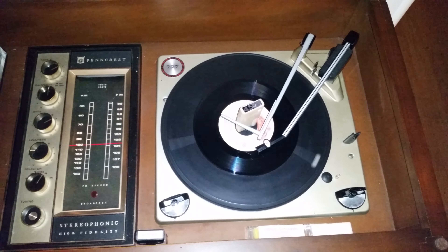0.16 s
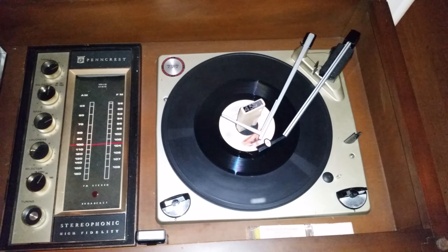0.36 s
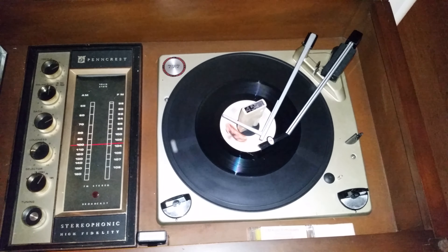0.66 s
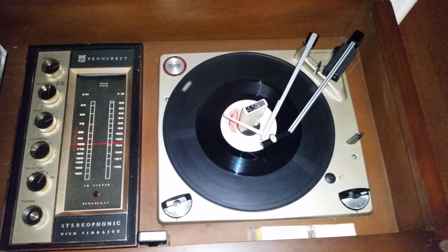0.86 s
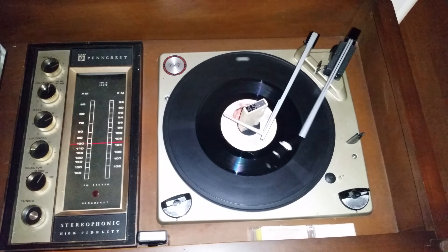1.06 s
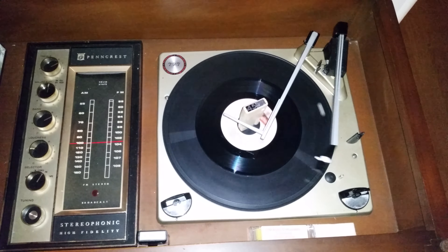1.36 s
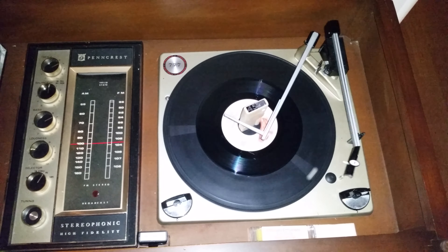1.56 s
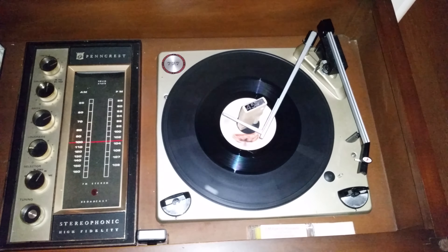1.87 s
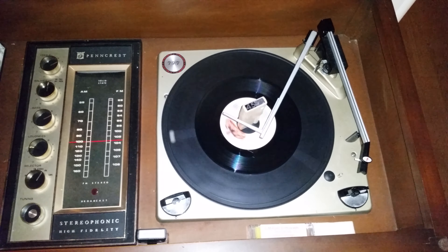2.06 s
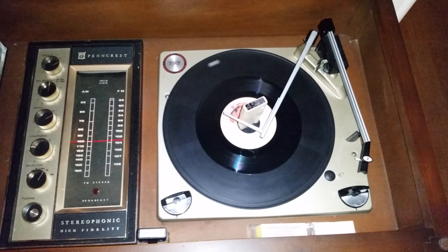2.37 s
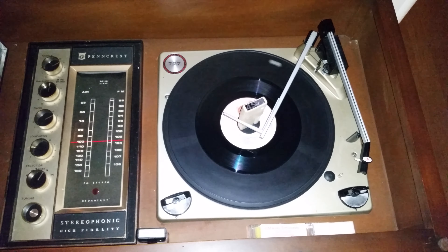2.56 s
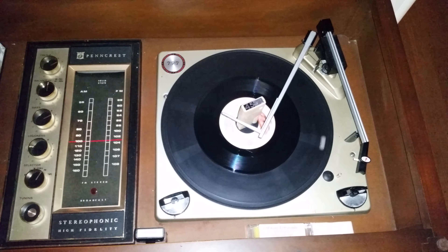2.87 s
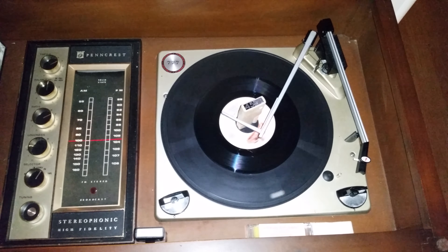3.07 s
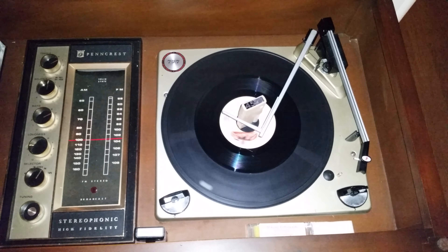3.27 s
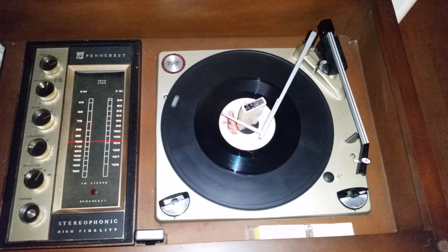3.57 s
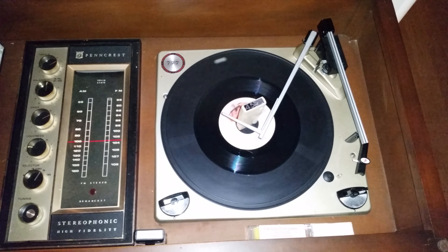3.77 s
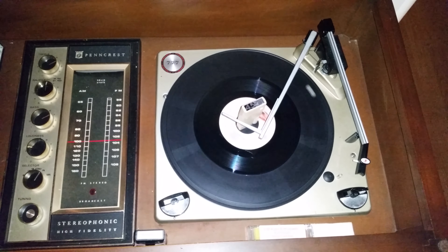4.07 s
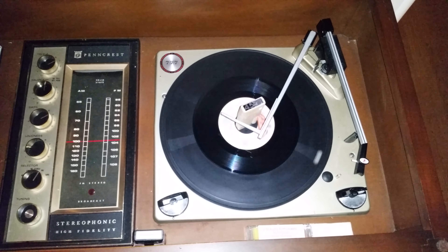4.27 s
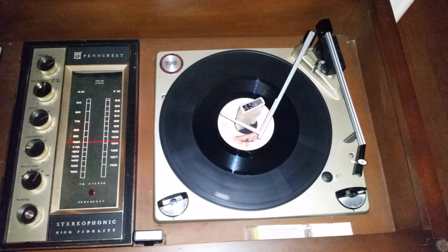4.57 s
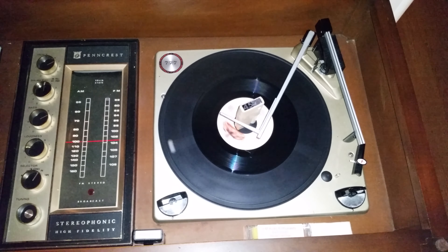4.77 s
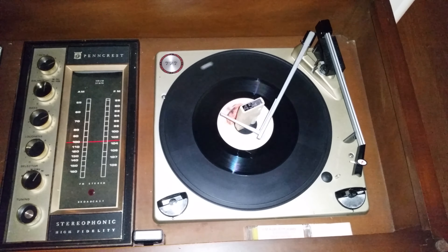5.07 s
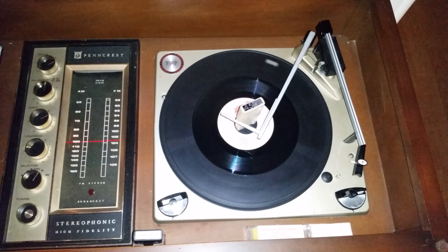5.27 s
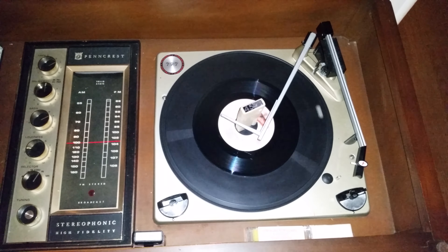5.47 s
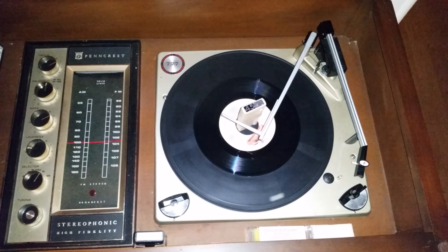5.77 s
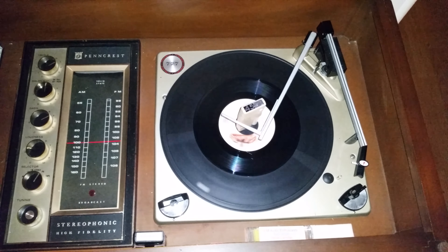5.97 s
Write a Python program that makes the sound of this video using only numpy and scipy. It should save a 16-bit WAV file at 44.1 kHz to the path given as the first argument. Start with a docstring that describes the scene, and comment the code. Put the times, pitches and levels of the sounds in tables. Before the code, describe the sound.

An old record changer's tonearm lifts and swings to rest with sharp metallic clicks and soft clunks over a humming, whirring motor, then snaps off.

```python
"""In a wooden cabinet, an automatic record changer lifts its tonearm, swings it to the rest and shuts off.
Shaped noise bursts make levers and cams click and rattle, coloured by broad resonances and ringing modes.
Soft pushes ring cabinet and sprung deck as clunks; faint noise ticks are the gears.
The motor is a humming sine under whirring noise until it is cut.
Two unlike microphone ports hear it from close above."""
import sys
import numpy as np
from scipy import signal
from scipy.fft import rfft, irfft
from scipy.io import wavfile
from scipy.ndimage import uniform_filter1d

SR = 44100
rng = np.random.default_rng(int(sys.argv[2]) if len(sys.argv) > 2 else 0)


def wav_record(signal):
    """Record a signal, one row per channel, as 16-bit PCM in the file named by sys.argv[1]."""
    frames = np.transpose(np.atleast_2d(signal))
    bounded = np.clip(frames, -1, 1)
    # unit amplitude maps onto the largest positive 16-bit level
    quanta = np.round(bounded * 32767).astype(np.int16)
    wavfile.write(sys.argv[1], SR, quanta)


N = 270333


def undb(db):
    """Decibels to gain."""
    return 10 ** (np.asarray(db) / 20)


def colour(x, table):
    """Equalise a left and right pair along log frequency; below the first row all but nothing passes."""
    hz, *ports = np.transpose(table)
    log_f = np.log(np.arange(N // 2 + 1) * SR / N + 1)
    gains_db = [np.interp(log_f, np.log(hz), port, -140) for port in ports]
    return irfft(rfft(x) * undb(gains_db), N)


def ring(x, modes):
    """Decaying modes driven by x, scaled so that decay time hardly changes the level under noise."""
    out = 0
    for hz, db, t60 in modes:
        # no mode dies faster than 60 dB in 0.02 s
        r = np.exp(-np.log(1000) / (max(t60, .02) * SR))
        w = 2 * np.pi * hz / SR
        mode = signal.lfilter([0, r * np.sin(w)], [1, -2 * r * np.cos(w), r * r], x)
        out = out + undb(db) * np.sqrt(1 - r) * mode
    return out


def resonate(x, hz, sharp):
    """One broad resonance of a struck part, passing its centre at unit gain."""
    return signal.lfilter(*signal.iirpeak(hz, sharp, SR), x)


def walk(rate):
    """Wandering level: random steps held for 1 / rate seconds, then smoothed twice."""
    k = int(SR / rate)
    steps = np.repeat(rng.standard_normal(N // k + 1), k)
    return 1.3 * uniform_filter1d(uniform_filter1d(steps, k), k)[:N]


def add(track, s, sound):
    """Mix a sound into a track at s seconds."""
    i = int(s * SR)
    track[..., i:i + sound.shape[-1]] += sound[..., :N - i]


# whirr and hiss at each port, before the whirr level: f/Hz, left level/dB per Hz, right level/dB per Hz
WHIRR_COLOUR = [(25, -77, -73), (61, -97.5, -88), (206, -90.5, -90), (648, -92.5, -99.5), (1240, -99, -101),
                (2550, -99, -106), (3500, -93.5, -109), (4430, -88, -112), (4750, -93, -114),
                (5960, -107, -116), (8010, -111, -115), (10100, -105, -112), (11680, -102, -102),
                (15860, -105, -105)]
# whirr level before the spin-down fall: t/s, level/dB
WHIRR_LEVEL = [(0, 4.5), (.5, 7.5), (.7, 1.5), (1.099, 4.5), (2.002, 7), (2.3, 0), (3.6, 0.5), (3.9, 5),
               (4.5, 0.5), (5.55, 2), (5.7, 3.5), (6.13, 11)]
HUM_HZ, HUM_DB, HUM_PER_WHIRR = 120.3, -64, 0.33  # base level; hum dB per dB of whirr level
TRIP_HUM_DB, TRIP_END_S = 9.5, 0.64  # extra hum while the trip gear engages
CUT_S, CUT_HUM_DB, COAST_S, SPIN_DOWN_DB_PER_S = 5.72, -11, 0.11, 63.5


def motor(share_hz=350, flicker_db=0.64):
    """Mains hum over a whirr whose bass the ports share; both follow the whirr level and sink after the cut."""
    t = np.arange(N) / SR
    level_db = np.interp(t, *np.transpose(WHIRR_LEVEL))
    tripping = np.clip((TRIP_END_S - t) / 0.15 + .5, 0, 1)
    cut = np.clip((t - CUT_S) / COAST_S, 0, 1)
    whirr_db = level_db - SPIN_DOWN_DB_PER_S * np.maximum(t - CUT_S - COAST_S, 0)
    hum_db = HUM_DB + HUM_PER_WHIRR * level_db + TRIP_HUM_DB * tripping + CUT_HUM_DB * cut
    # the ports grow less alike with rising frequency
    f = np.arange(N // 2 + 1) * SR / N
    like = 0.61 / (1 + (f / share_hz) ** 2)
    mid, side = rfft(rng.standard_normal((2, N)))
    mid = np.sqrt((1 + like) / 2) * mid
    side = np.sqrt((1 - like) / 2) * side
    pair = irfft(mid + side * np.array([[1], [-1]]), N)
    whirr = colour(pair * np.sqrt(SR / 2), WHIRR_COLOUR) * undb(whirr_db + flicker_db * walk(4.3))
    bass = signal.sosfilt(signal.butter(1, 220, fs=SR, output="sos"), whirr)
    whirr = whirr - bass * cut * 0.41  # the shaft rumble drops first
    hum = np.sqrt(2) * np.sin(2 * np.pi * HUM_HZ * t) * undb(hum_db + 2.0 * walk(6.0))
    return whirr + hum * undb([[.8], [-.8]])


# modes of cabinet and deck, from deep thud up to deck plate: f/Hz, level/dB, t60/s
THUD_MODES = [(71.6, 11.5, 0.18), (108, 0, 0.18)]
KNOCK_MODES = [(162, 0, 0.13), (179, -8, 0.15), (241, 1.5, 0.04)]
RING_MODES = [(355, -1.5, 0.08), (310.5, -3, 0.05)]
DECK_MODES = [(609, -6, 0.042), (719, -4.5, 0.038), (790, -10, 0.29), (1157, -15, 0.023), (948, -18, 0.062)]


def trip(rumble_db=-53, scrape_db=-66):
    """While the trip gear engages, uneven noise rumbles the cabinet and faintly scrapes the deck."""
    engaged = np.clip((TRIP_END_S - np.arange(N) / SR) / 0.053, 0, 1)
    drive = engaged * undb(walk(17.0) * 2.0) * rng.standard_normal(N)
    rumble = undb(rumble_db) * ring(drive, THUD_MODES[1:] + KNOCK_MODES)
    scrape = undb(scrape_db) * ring(drive, RING_MODES + DECK_MODES)
    return rumble + scrape


# how each port hears the body of the metal parts: f/Hz, left level/dB, right level/dB
BODY_COLOUR = [(540, -1, -10), (1210, -0.5, -4), (3230, -2.5, -17.5), (6050, -3, -12), (9000, 0, -18.5)]


def gears(count=380, rub_db=-48.5, spread_db=4, deck_db=-8):
    """Faint, irregular noise ticks from 700 to 2800 Hz follow the whirr level and start until the motor is cut."""
    out = np.zeros((2, N))
    t = np.arange(int(.06 * SR)) / SR
    rubs = rng.standard_normal((count, len(t)))
    for (when, pitch, chance), rub in zip(rng.random((count, 3)), rubs):
        s = when * CUT_S
        level_db = np.interp(s, *np.transpose(WHIRR_LEVEL))
        luck_db = -spread_db * np.log(chance + 0.0304)  # a few ticks stand out
        tick = rub * undb(rub_db + level_db + luck_db - 60 * t / 0.025)
        add(out, s, resonate(tick, 700 * 4 ** pitch, 6))
    return colour(out, BODY_COLOUR) + undb(deck_db) * ring(out[0], DECK_MODES[:2])


DECK_DB = -19  # the deck's share of a click's parts blow
# metal clicks: t/s, snap level/dB, parts level/dB re snap, parts centre f/Hz, decay/ms per 60 dB
METAL_CLICKS = [(0.045, -8.5, -3.5, 2630, 45.5), (0.053, -24.5, 2.5, 2260, 106),
                (0.404, -29.5, 5.5, 1990, 64), (0.517, -33.5, -2.5, 2080, 29), (1.074, -41, 7, 2420, 41),
                (1.103, -30, -2.5, 2650, 40), (1.184, -33, -6.5, 1900, 137),
                (1.217, -7.5, -12.5, 2860, 68.5), (1.439, -7.5, -19, 3280, 61.5),
                (1.455, -9, -25, 3300, 49.5), (1.549, -26.5, -3, 3370, 28), (1.638, -34.5, 0, 1340, 36),
                (1.652, -29.5, -2.5, 2884, 132), (1.706, -12.5, -11.5, 2970, 44.5),
                (1.789, -19.5, -8, 2860, 33), (1.875, -25, -5.5, 2770, 52), (1.915, -14, -14.5, 3620, 68.5),
                (1.941, -9.5, -18, 3700, 68), (1.954, -8, -17, 3390, 20), (1.959, -11, -23.5, 3400, 38.5),
                (2.115, -29, -11.5, 1670, 34), (2.159, -39, -3, 1580, 54), (2.36, -48.5, 6.5, 1730, 55),
                (2.971, -32, -9.5, 1610, 59), (3.174, -37.5, -1.5, 1000, 35), (3.739, -43, 6.5, 2390, 60),
                (3.76, -27, 0, 2400, 49), (3.797, -36.5, -6, 2400, 58), (3.877, -6, -10.5, 3430, 50.5),
                (3.883, -11.5, -14.5, 1780, 44), (3.934, -17, -9.5, 2630, 40.5),
                (3.939, -29, 2.5, 4170, 54), (4.055, -48.5, 16, 2680, 31.5), (4.212, -42.5, -6.5, 1290, 90),
                (4.345, -34, -3, 3740, 43), (4.361, -25.5, -4, 3500, 56), (4.516, -34, 2.5, 2410, 48),
                (4.925, -15.5, -0.5, 2600, 69), (5.109, -43, 2.5, 2540, 86.5),
                (5.299, -18.5, 2.5, 2740, 55), (5.503, -33, -1, 2980, 42.5), (5.585, -13, -13.5, 3070, 36),
                (5.657, -38.5, 1, 3200, 61), (5.712, -2, -9, 3300, 60.5), (5.729, -12, -5.5, 4200, 48.5),
                (5.794, -2.5, -12, 3040, 38.5), (5.818, -8.5, -5.5, 1690, 47.5)]


def clicks(chatter, rise_ms=1.0, hold_ms=0.18):
    """Each click is a swarm of tiny impacts that dies in ms; each struck part has its own colour."""
    t = np.arange(int(.2 * SR)) * 1000 / SR  # ms
    snap, deck, body = np.zeros(N), np.zeros(N), np.zeros((2, N))
    for s, db, body_db, hz, decay_ms in METAL_CLICKS:
        fall_db = 60 * np.maximum(t - hold_ms, 0) / decay_ms
        shape = np.minimum(t / rise_ms, 1) * undb(db - fall_db)
        grains = chatter[:, int(s * SR):][:, :len(t)]
        add(snap, s, shape)
        add(deck, s, shape * undb(body_db + DECK_DB))
        add(body, s, resonate(shape * undb(body_db) * grains, hz, 2.38))
    return snap, deck, body


def well(x, t60_s=0.25, level_db=-13):
    """The wooden well around the deck keeps the clatter for a moment: a decaying noise tail at each port."""
    t = np.arange(int(.4 * SR)) / SR
    tail = rng.standard_normal((2, len(t))) * undb(-60 * t / t60_s) * np.minimum(t / 0.0036, 1)
    tail *= undb(level_db) / np.sqrt(np.sum(tail ** 2, axis=1, keepdims=True))
    return signal.fftconvolve(x, tail, axes=1)[:, :N]


# the knock lies between thud and ring and follows the stronger; the push also shakes the upper deck modes
KNOCK_RE_THUD_DB, KNOCK_RE_RING_DB, SHAKE_RE_RING_DB = -2.5, -7.5, -7
# thuds set below this level lose the deepest mode faster (dB, extra dB per dB)
DEEP_FROM_DB, DEEP_LOSS = -34, 1.58
# soft clunks: t/s, cabinet thud push level/dB, deck ring push level/dB
SOFT_CLUNKS = [(0.055, -43.5, -52.5), (0.243, -45.5, -56), (0.342, -54.5, -57.5), (0.364, -63, -65),
               (0.415, -87, -59.5), (0.499, -58, -59.5), (0.52, -55, -56), (0.559, -40.5, -60),
               (0.989, -62.5, -70), (1.078, -70, -53.5), (1.633, -65.5, -53.5), (1.661, -64, -54),
               (3.756, -85, -62), (3.939, -86, -66), (4.681, -68, -52), (4.693, -86, -58),
               (4.707, -89, -50), (5.502, -85.5, -64)]


def clunks(push_ms=20, grit_ring_db=18, grit_db=14, rough_db=8):
    """A soft push of the cam gear rings cabinet and deck over a gritty contact; strong noise roughens the push
    differently at each port."""
    bodies = THUD_MODES[:1], THUD_MODES[1:], KNOCK_MODES, RING_MODES, DECK_MODES[1:] + DECK_MODES[:1]
    tracks = np.zeros((len(bodies), N))
    push = np.hanning(int(push_ms * SR / 1000))
    for s, thud_db, ring_db in SOFT_CLUNKS:
        deep_db = thud_db - DEEP_LOSS * max(DEEP_FROM_DB - thud_db, 0)
        knock_db = max(thud_db + KNOCK_RE_THUD_DB, ring_db + KNOCK_RE_RING_DB)
        levels_db = deep_db, thud_db, knock_db, ring_db, ring_db + SHAKE_RE_RING_DB
        for track, db in zip(tracks, levels_db):
            add(track, s, undb(db) * push)
    rub = tracks[-1] * rng.standard_normal(N)
    t = np.arange(N) / SR
    rough = undb(rough_db) * rng.standard_normal((2, N))  # unlike at the two ports
    out = 0
    for track, modes in zip(tracks, bodies):
        # the push shudders at the first listed mode of each body
        shudder = np.sin(2 * np.pi * modes[0][0] * t)
        out = out + ring(track * (shudder + rough), modes)
    grit = undb(grit_ring_db) * ring(rub, DECK_MODES) + undb(grit_db) * resonate(rub, 1180, 1.0)
    return (out + grit) * undb([[.4], [-.4]])


# loose linkage scraping: t/s, hold/s, snap level/dB, parts level/dB, parts centre f/Hz, deck level/dB
LINKAGE_RATTLES = [(1.072, 0.025, -43, -39.5, 2540, -44), (1.211, 0.011, -36, -29.5, 3400, -34.5),
                   (1.432, 0.016, -36, -28.5, 3303, -50), (1.628, 0.011, -44, -53, 2480, -42.5),
                   (1.908, 0.04, -18, -25, 3530, -44), (5.578, 0.049, -44, -42.5, 2840, -54.5),
                   (5.741, 0.016, -26.5, -28.5, 3950, -54), (5.807, .014, -33.5, -23.5, 2585, -38)]


def rattles(chatter, attack_ms=6.9, release_ms=27, grain_ms=3.9, spread_db=0.5):
    """Loose linkage scrapes and chatters on: each rattle holds in uneven contacts, then dies away."""
    t = np.arange(int(.2 * SR)) * 1000 / SR  # ms
    snap, deck, body = np.zeros(N), np.zeros(N), np.zeros((2, N))
    k = int(grain_ms * SR / 1000)
    for s, hold_s, db, body_db, hz, deck_db in LINKAGE_RATTLES:
        release = np.exp(-np.maximum(t - 1000 * hold_s, 0) / release_ms)
        contacts = np.repeat(rng.standard_normal(len(t) // k + 1), k)[:len(t)]
        shape = np.minimum(t / attack_ms, 1) * release * undb(spread_db * contacts)
        grains = chatter[:, int(s * SR):][:, :len(t)]
        add(snap, s, shape * undb(db))
        add(deck, s, shape * undb(deck_db))
        add(body, s, resonate(shape * undb(body_db) * grains, hz, 2.68))
    return snap, deck, body


# how each port hears the bright snap of contact: f/Hz, left level/dB, right level/dB
SNAP_COLOUR = [(4500, -19.5, -38), (7900, -13, -45), (8610, -12.5, -7.5), (10220, 3.5, -10.5),
               (10650, -3, 5.5), (11820, 1, -2), (15700, -8, -8), (16800, -32, -14.5)]
# modes of the levers and the arm: f/Hz, level/dB, t60/s
PART_MODES = [(1650, -11.5, 0.045), (1847, 1, 0.028), (2294, -4, 0.064), (3300, -5, 0.0099),
              (3570, -3, 0.037), (4296, 1, .03), (4800, 0, 0.069), (6430, 1.5, .03)]


def metalwork(spike_db=2.5, grain_ms=0.66, shared=0.29, ring_db=-11.5, dry_db=2):
    """Clicks and rattles snap, ring the levers and the arm, strike the deck and echo in the well."""
    # single impacts differ in strength, the same for both ports
    k = int(grain_ms * SR / 1000)
    impacts = undb(spike_db * np.repeat(rng.standard_normal(N // k + 1), k)[:N])
    noise = impacts * rng.standard_normal((3, N))
    noise = np.pad(noise, ((0, 0), (0, int(.2 * SR))))  # room for a last click
    chatter = noise[1:] + shared * noise[0]
    snap, deck, body = (a + b for a, b in zip(clicks(chatter), rattles(chatter)))
    body = undb(dry_db) * body + undb(ring_db) * ring(body, PART_MODES)
    bright = colour(snap * rng.standard_normal((2, N)) * impacts, SNAP_COLOUR)
    near = bright + colour(body, BODY_COLOUR)
    blow = deck * rng.standard_normal(N)
    plate = ring(blow, DECK_MODES) + undb(-15) * ring(blow, RING_MODES + KNOCK_MODES)
    return near + well(near) + plate * undb([[1.6], [-1.6]])


def scene():
    """Clicks, rattles, clunks, trip and gears over the motor."""
    return motor() + trip() + gears() + metalwork() + clunks()


def record(dry, left_hz=54, right_hz=59, top_hz=15800):
    """Each port thins the deep bass in its own way; peaks are clipped at full scale and the top is cut."""
    thin = []
    for x, hz in zip(dry, (left_hz, right_hz)):
        thin.append(signal.sosfilt(signal.butter(3, hz, "high", fs=SR, output="sos"), x))
    top_cut = signal.ellip(10, .2, 85, top_hz, fs=SR, output="sos")
    return signal.sosfilt(top_cut, np.clip(thin, -1, 1))


dry = scene()
out = record(dry)
wav_record(out)
```